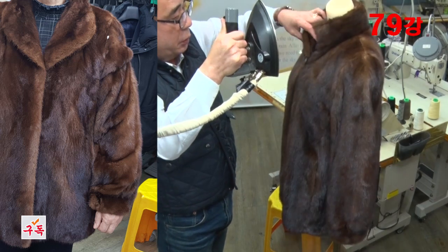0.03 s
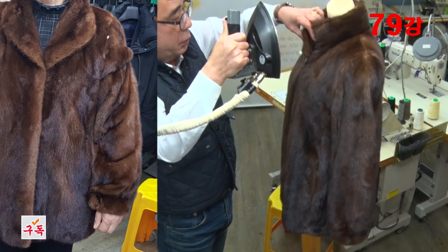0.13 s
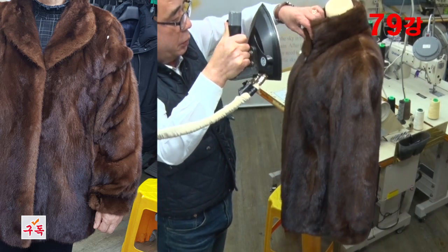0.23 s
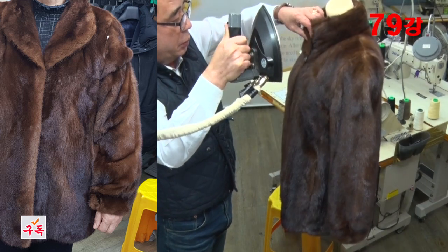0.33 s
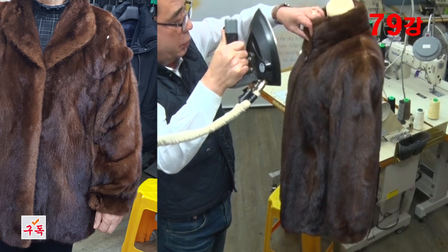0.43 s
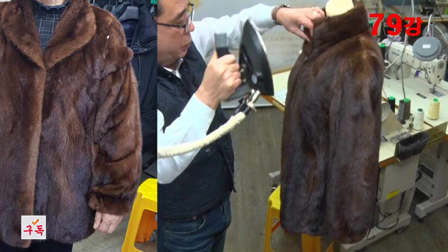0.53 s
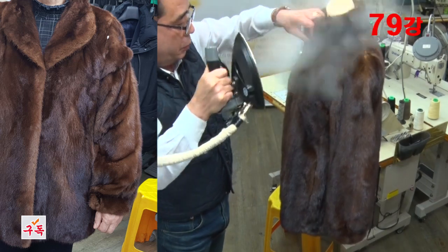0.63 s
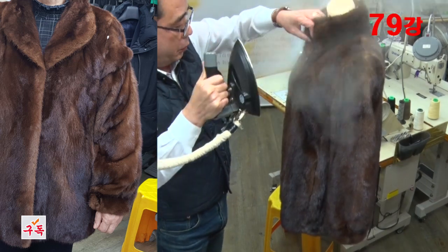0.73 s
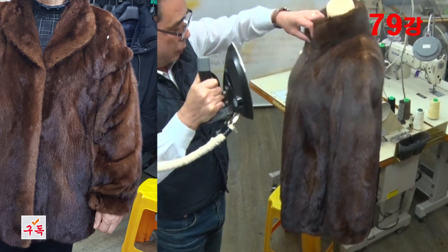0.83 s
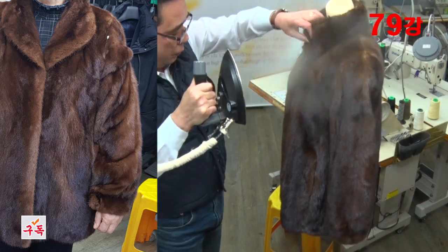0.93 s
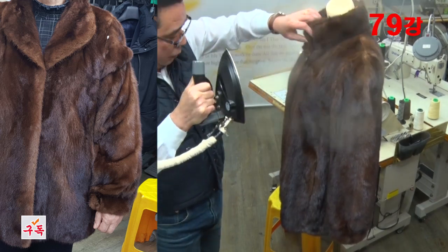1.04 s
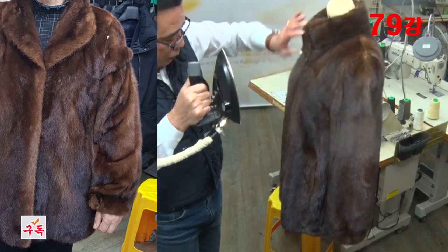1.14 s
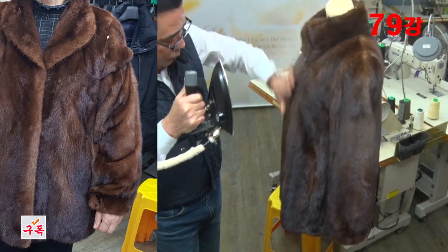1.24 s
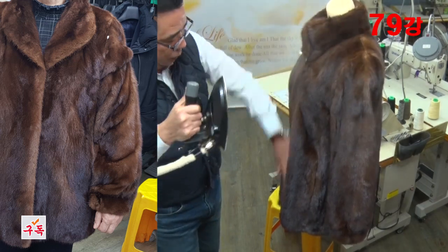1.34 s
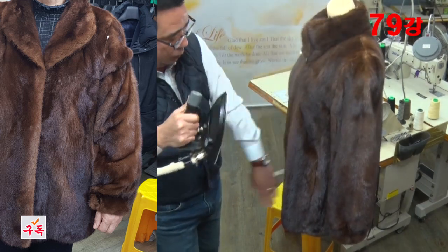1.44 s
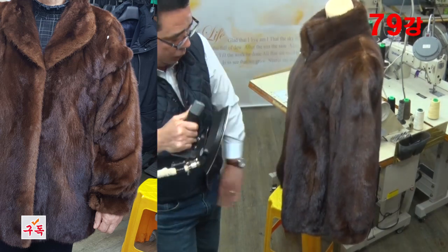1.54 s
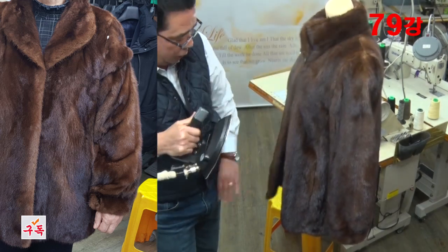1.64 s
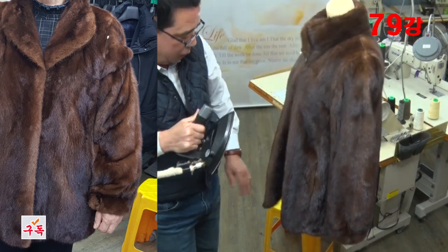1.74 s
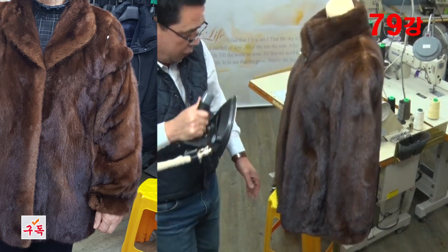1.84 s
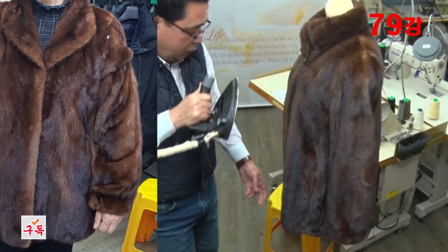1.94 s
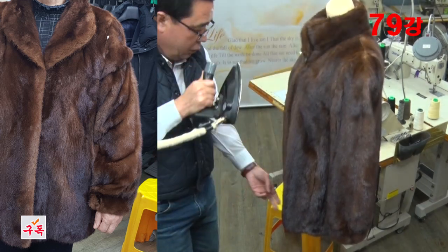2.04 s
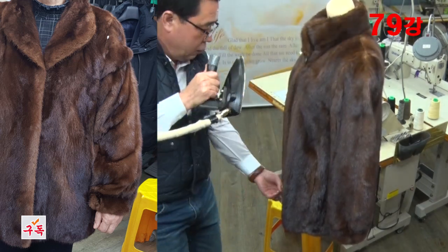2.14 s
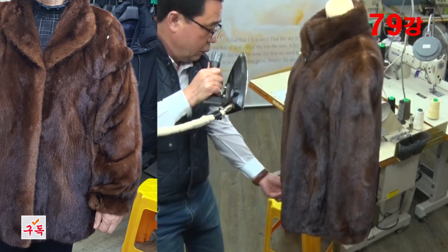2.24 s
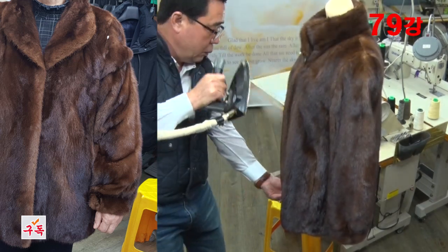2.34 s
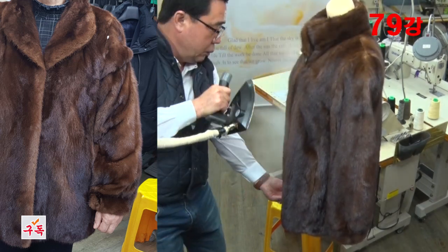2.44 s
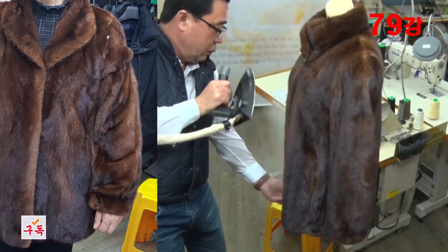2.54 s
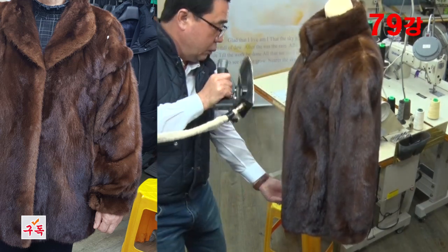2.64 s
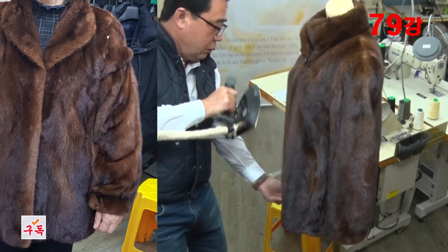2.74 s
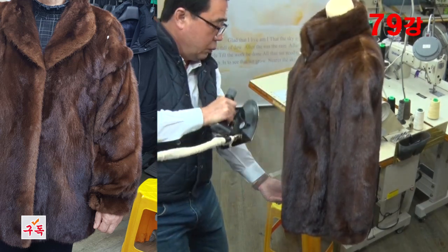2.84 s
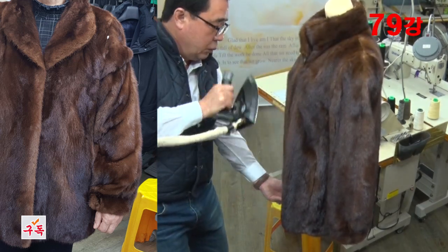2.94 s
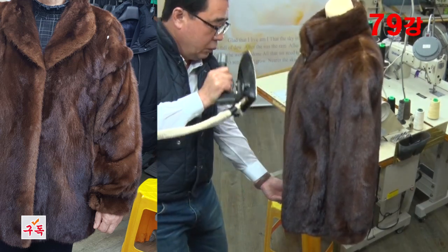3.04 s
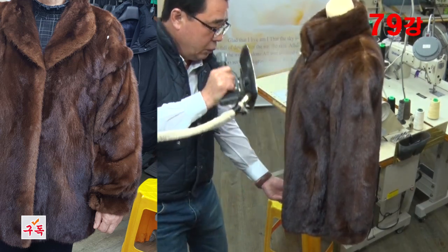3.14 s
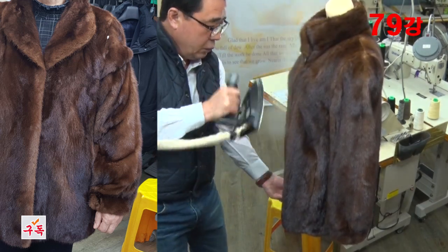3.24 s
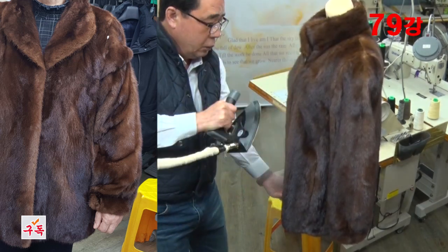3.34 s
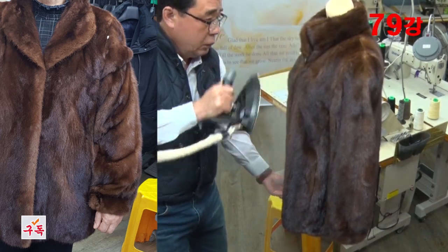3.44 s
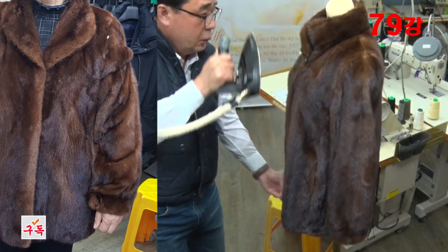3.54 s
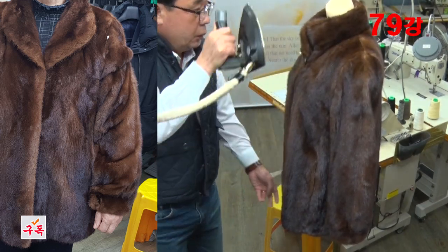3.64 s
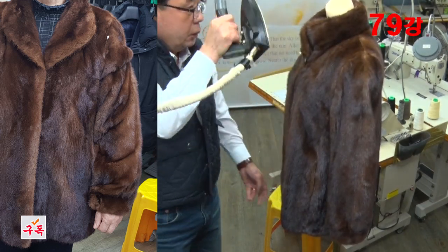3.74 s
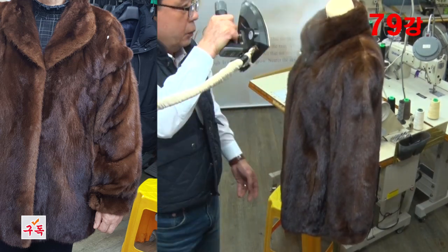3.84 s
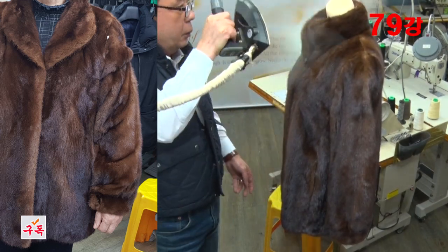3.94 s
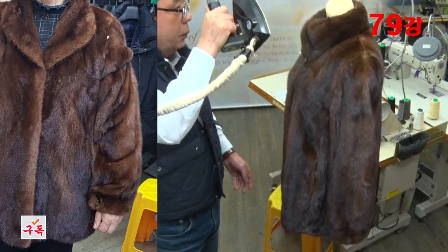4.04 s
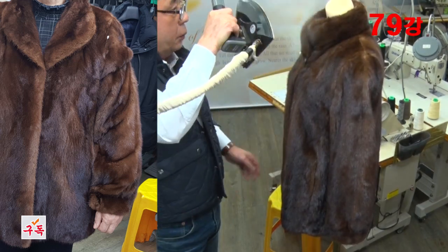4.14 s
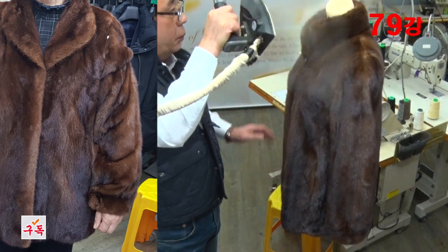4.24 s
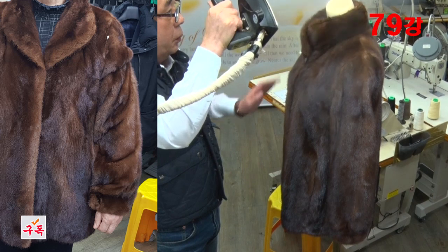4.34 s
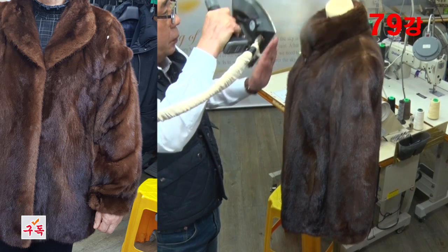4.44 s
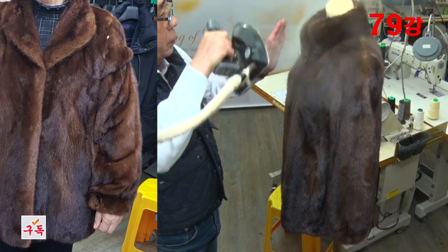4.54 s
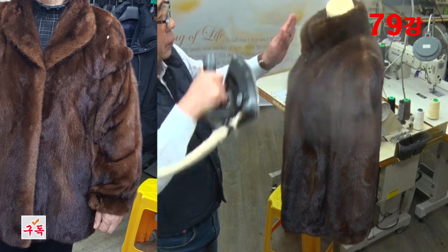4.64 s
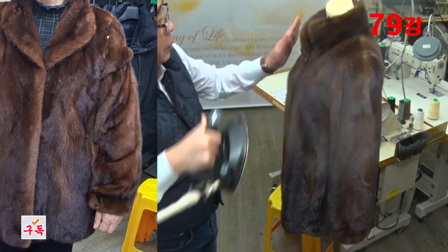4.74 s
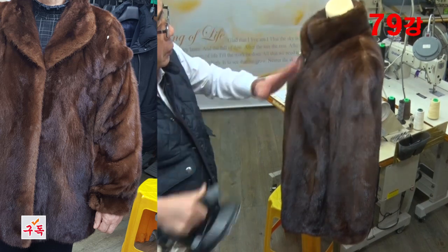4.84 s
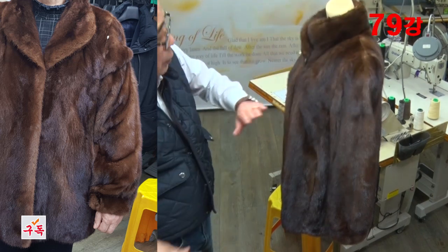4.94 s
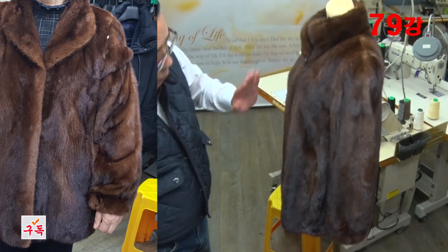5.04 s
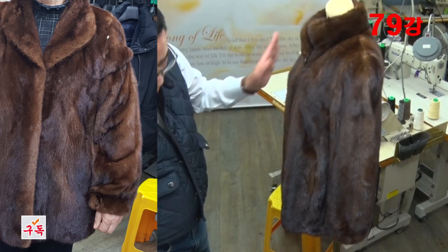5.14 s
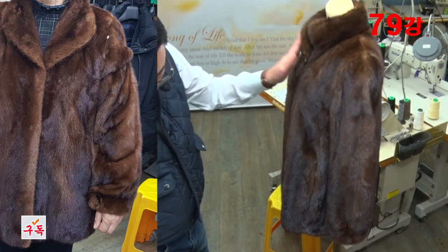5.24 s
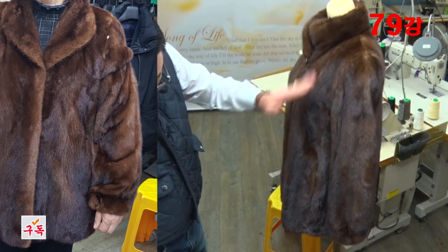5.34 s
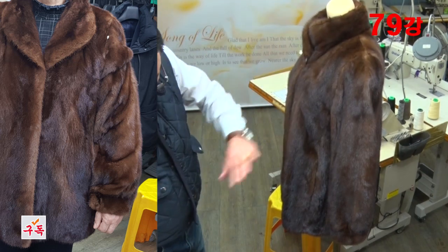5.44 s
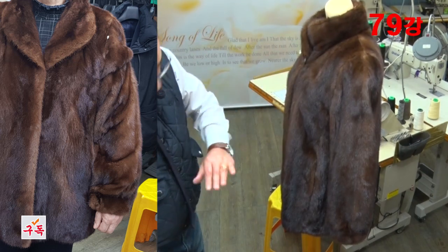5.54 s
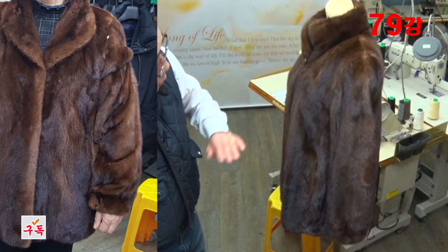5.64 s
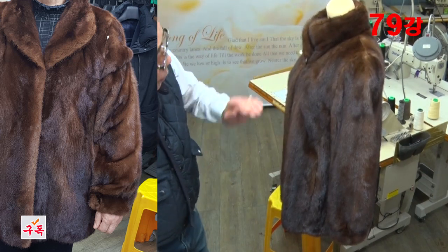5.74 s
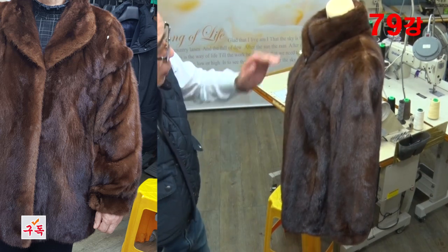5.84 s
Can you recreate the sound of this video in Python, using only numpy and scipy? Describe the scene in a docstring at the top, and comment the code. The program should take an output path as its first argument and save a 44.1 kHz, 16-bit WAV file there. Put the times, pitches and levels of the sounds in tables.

```python
"""A workshop, the microphone close to a hose-fed steam iron blowing seven bursts at a fur coat.
Turbulent jets hiss from the sole plate, coloured by the steam chamber; the valve leaks a trickle
and a nozzle whistles twice. Thin scrapes and a few dull knocks sound nearby; behind them a
transformer hums and a fan drones. The room answers briefly and the gain control ducks under the blasts."""
import sys
import numpy as np
from scipy import signal
from scipy.fft import rfft, irfft, next_fast_len
from scipy.io import wavfile
from scipy.ndimage import uniform_filter1d, map_coordinates

SR = 44100
rng = np.random.default_rng(int(sys.argv[2]) if len(sys.argv) > 2 else 0)


def file_out(sig):
    """Save sig as 16-bit WAV at sys.argv[1]."""
    # one column per channel
    cols = np.atleast_2d(sig).T
    # limit, then scale
    lim = np.clip(cols, -1, 1)
    pcm = np.round(lim * 32767).astype(np.int16)
    wavfile.write(sys.argv[1], SR, pcm)


N = 260190

# Transformer: (frequency [Hz], level [dB])
HUM_TONES = [(120, -46.5)]
# Fan: (frequency [Hz], width [Hz], level [dB])
FAN_TONES = [(74.3, 7.1, -52), (152.5, 8.8, -56), (304.7, 31, -63.5), (378, 10, -70), (101.5, 4.7, -58),
             (236, 18.7, -59), (808, 35, -67)]
# Spectra of the shop's air, low and high: (frequency [Hz], relative level [dB])
AIR_RUMBLE = [(12, -49), (25, -15), (36, -20), (48, -23), (60, -9.5), (90, -10.5), (140, -10), (200, -14),
              (270, -18), (385, -16), (800, -23.5), (1500, -24.5), (1950, -42), (3300, -120)]
AIR_TREBLE = [(880, -39), (1500, -6), (2040, -4.5), (3060, -7.5), (3930, -10.5), (5000, -12.5),
              (5800, -16.5), (7350, -19.5), (9300, -22.5), (10200, -29), (12500, -30.5), (15000, -44),
              (16000, -46)]
# Spectrum of the echo, filtered off above 10 kHz: (frequency [Hz], relative level [dB])
ECHO_COLOUR = [(60, -46), (500, -0.5), (3000, -4), (6000, 2.5), (10000, 1), (12000, -42)]
# Decay of the echo: (frequency [Hz], time to fall 60 dB [s])
ECHO_DECAY = [(300, .4), (2000, 0.5), (6000, 0.37), (14000, 0.16)]
# Likeness of left and right; above about 10 kHz the two sides become alike: (frequency [Hz], correlation [0-1])
AIR_LIKENESS = [(20, 1), (150, 1), (200, 1), (380, .98), (700, 0.93), (1290, 0.77), (2380, .71),
                (4400, .74), (8500, 0.55), (10500, 0.99), (12000, 1)]
JET_LIKENESS = [(700, 1), (1500, 1), (3500, 1), (4500, 0.98), (6000, 0.91), (9000, 0.92), (10500, 0.98),
                (12000, 1)]
# Thin hisses, always faintly there: (centre [Hz], level [dB])
FAINT_BANDS = [(1960, -69), (4350, -73), (4920, -73)]
# Scrapes near the same pitches: (start [s], length [s], centre [Hz], level [dB])
SCRAPES = [(1.915, 0.042, 1920, -54), (1.92, .08, 4300, -62), (1.99, 0.037, 1950, -57),
           (2.01, 0.244, 4310, -58), (2.01, .07, 4900, -62), (2.07, 0.11, 1870, -57),
           (2.197, 0.058, 1964, -59), (3.62, 0.18, 4900, -64), (4.917, 0.054, 4370, -58.5),
           (4.93, 0.08, 4920, -62), (4.93, 0.073, 1980, -58), (5.05, 0.049, 1900, -53.5),
           (5.136, .06, 2080, -50), (5.255, 0.097, 2030, -54), (5.265, 0.1, 4990, -64),
           (5.43, 0.15, 1836, -61), (5.63, .17, 4850, -66), (5.7, 0.086, 1865, -55), (5.84, .05, 4500, -60),
           (5.853, .05, 1900, -58)]
# Dull knocks: (time [s], relative level [dB], ring offset [dB])
KNOCKS = [(2.232, -30.5, -15), (2.299, -31, -17), (2.468, -44.5, 7.5), (2.568, -29, -17),
          (2.854, -30, -6.5), (3.176, -28.5, -11), (3.318, -46, 4), (3.419, -41.5, 1.5), (3.539, -37.5, -1)]
# Modes of the hollow body: (frequency [Hz], relative level [dB], time to fall 60 dB [s])
KNOCK_MODES = [(239.5, 0.5, 0.12), (340.4, -3.5, 0.18), (453, 2.5, 0.068), (598, 0.5, 0.089),
               (147, 3, 0.11)]
# Spectra of the steam: (frequency [Hz], relative level [dB])
ROAR_SPECTRUM = [(470, -23), (800, -11), (864, -10.5), (1320, -4.5), (1420, -5.5), (1960, 0.5),
                 (2620, -1.5), (3300, 0.5), (4290, -4), (7260, -120)]  # large eddies
HISS_SPECTRUM = [(1940, -23), (3300, -9.5), (3880, -5.5), (4770, 1.5), (6000, -5), (7800, -6),
                 (13200, -120)]  # jets at the sole-plate holes
BRIGHT_SPECTRUM = [(3530, -40.5), (6000, -3), (6810, -4.5), (8210, -2.5), (10500, -7), (13600, -16.5),
                   (22000, -120)]  # the part that beams along the jet
FIZZ_SPECTRUM = [(6180, -22), (10500, -4.5), (13200, -6.5), (15100, -5.5), (15800, -8.5)]  # finest turbulence
SPIT_SPECTRUM = [(2500, -30), (3700, -8), (4300, 1), (5300, -2), (6200, -12), (9000, -24), (14000, -60)]  # the first thin jet
# Steam chamber resonances: (centre [Hz], width [Hz], lift [dB])
CHAMBER_RESONANCES = [(1950, 96, -1), (4700, 120, -3), (5460, 150, 3), (8300, 320, 2)]
# Nozzle whistles, one path each: (time [s], level [dB], pitch [Hz])
WHISTLE_PATHS = [
    [(1.2, -62, 4900), (1.35, -49, 4830), (1.42, -46, 4820), (1.5, -54, 4880), (1.56, -60, 4850)],
    [(2.7, -59, 6430), (2.94, -42, 6300), (3.05, -46.5, 6400), (3.14, -43, 6460), (3.22, -40, 6400),
     (3.3, -52, 6500), (3.5, -48, 6250), (3.6, -64, 6480), (3.8, -66, 6480)],
]
# Their bandwidths: (first [Hz], second [Hz])
WHISTLE_WIDTHS = [800, 260]
# Trigger presses: (start [s], attack [s], held [s], hiss level [dB], sag [dB/s], release [dB/s],
# spit delay [s], spit level [dB], roar [dB], bright [dB], fizz [dB], aim left over right [dB]);
# roar, bright and fizz are relative to the hiss
PRESSES = [(0.576, 0.076, 0.22, -27.5, 17, 220, 0.013, -30, -4.5, 2, -3.5, 0.58),
           (0.895, 0.053, 0.21, -30, 7.1, 140.4, 0.0099, -32, -5, 3, -4, .8),
           (2.345, 0.085, .725, -29.5, 5.7, 133, 0.0033, -39, -6, 2.1, -4.5, 1.2),
           (3.185, 0.037, 0.34, -31, 4.9, 270, 0.01, -27, -5.5, 1.9, -3, 1.1),
           (3.798, 0.066, 0.25, -32, 5.2, 238, .005, -29.5, -4, 5.3, -1.5, .4),
           (4.156, 0.045, .19, -31, 5.1, 241, 0.015, -31, -5, 3.4, -4.5, 0.51),
           (4.465, 0.047, 0.24, -30.5, 1.1, 270, .006, -36, -4.5, 2.5, -5.5, .3)]
# Colour shifts within a press: (roar [dB], bright [dB], fizz [dB], aim [dB])
LOST_WHILE_HELD = [-0.1, 1, -3, 0]
MISSING_AT_OPENING = [2, 5, 5, -1.2]
# Leaks past the valve: (start [s], length [s], hiss level [dB], first bright [dB], last bright [dB],
# fizz [dB])
TRICKLES = [(1.105, 0.39, -42, 6, -4, -10), (3.053, 0.2, -44.5, -2, 12, -4),
            (4.042, 0.21, -45.5, -7, -2, -9)]


def amp(db):
    """dB to gain."""
    return 10 ** (np.asarray(db) / 20)


def unit(x):
    """Scaled to rms 1."""
    return x / np.sqrt(np.mean(x ** 2) + 1e-20)


def along(points, hz):
    """(frequency [Hz], value) points joined on a log axis."""
    freqs, values = np.transpose(points)
    return np.interp(np.log(hz + 1), np.log(freqs + 1), values)


def wobble(rate):
    """A smooth random curve, rate knots a second."""
    knots = rng.standard_normal(int(N * rate / SR) + 4)
    return map_coordinates(knots, [np.arange(N) * rate / SR])


def filtered(x, response):
    """x shaped by a gain that depends on frequency."""
    size = next_fast_len(N + SR // 2)
    return irfft(rfft(x, size) * response(np.fft.rfftfreq(size, 1 / SR)), size)[..., :N]


def rush(spectrum_db, likeness, patchy_db, drift_db=0):
    """Stereo noise of rms 1 with small patches of random gain and a slower drift of colour."""
    def patches(bins, frames):  # 86 Hz a bin, 6 ms a frame
        field = uniform_filter1d(rng.standard_normal(cells.shape[1:]), bins, axis=0)
        return unit(uniform_filter1d(field, frames, axis=1))

    def mid_side_gains(hz):
        angle = np.arccos(np.clip(along(likeness, hz), -1, 1)) / 2
        return amp(spectrum_db(hz)) * [np.cos(angle), np.sin(angle)]

    cells = signal.stft(rng.standard_normal((2, N)), nperseg=512)[2]
    cells *= amp(patchy_db * patches(4, 8) + drift_db * patches(10, 50))
    pair = signal.istft(cells, nperseg=512)[1][:, :N]
    mid, side = filtered(pair, mid_side_gains)
    return unit(np.array([mid + side, mid - side]))


def narrow(hz, width):
    """A wavering tone of rms 1: noise width Hz wide about a centre that may move."""
    slow = filtered(rng.standard_normal((2, N)), lambda f: 1 / (1 + (2 * f / width) ** 4))
    phase = 2 * np.pi * np.cumsum(hz * np.ones(N)) / SR
    return unit(slow[0] * np.cos(phase) + slow[1] * np.sin(phase))


def shop_air():
    """Room tone: a broad rumble, and treble a little to the left."""
    rumble = rush(lambda hz: along(AIR_RUMBLE, hz), AIR_LIKENESS, patchy_db=1.1)
    treble = rush(lambda hz: along(AIR_TREBLE, hz), AIR_LIKENESS, patchy_db=0.8)
    return amp(-47) * rumble + amp(-52.5) * treble * amp([[.4], [-.4]])


def transformer():
    """Mains hum in the background, almost steady."""
    t = np.arange(N) / SR
    return sum(amp(db + 0.14 * wobble(3.54)) * np.sqrt(2) * np.sin(2 * np.pi * hz * t)
               for hz, db in HUM_TONES)


def fan():
    """A background drone of unsteady tones."""
    return sum(amp(db) * narrow(hz, width) for hz, width, db in FAN_TONES)


def room_echo(near):
    """The workshop's short answer, each frequency dying at its own speed."""
    hz, t, cells = signal.stft(rng.standard_normal((2, SR // 2)), SR, nperseg=256)
    fade = amp(along(ECHO_COLOUR, hz)[:, None] - 60 * t / along(ECHO_DECAY, hz)[:, None])
    tail = signal.istft(cells * fade, SR, nperseg=256)[1]
    return signal.fftconvolve(near[None], tail / np.linalg.norm(tail[0]), axes=1)[:, :N]


def scrapes(width_hz=260, edge_s=.03):
    """Faint narrow hisses, and short flickering scrapes between the bursts."""
    t = np.arange(N) / SR
    bands = sum(amp(db + 3.9 * wobble(9.1)) * narrow(hz, width_hz) for hz, db in FAINT_BANDS)
    flicker = amp(2.5 * wobble(35))
    for start, length, hz, db in SCRAPES:
        swell = np.clip(np.minimum(t - start, start + length - t) / edge_s + .5, 0, 1)
        bands += amp(db) * swell * flicker * narrow(hz, width_hz)
    return bands


def knocks(ring_hz=767, ring_t60_s=0.23):
    """Soft blows on something hollow nearby, each with a rough higher ring."""
    track, t = np.zeros(N + SR), np.arange(SR // 4) / SR
    rattle = np.sin(2 * np.pi * ring_hz * np.arange(N) / SR) + 0.72 * narrow(ring_hz, width=110)
    onset = 1 - np.exp(-t / 0.006)
    for start, db, ring_db in KNOCKS:
        at = round(start * SR)
        body = 0
        for hz, mode_db, t60 in KNOCK_MODES:
            decay = amp(mode_db + rng.normal(0, 2.66) - 60 * t / t60)
            body += decay * np.sin(2 * np.pi * hz * rng.normal(1, 0.044) * t)
        ring = amp(ring_db + 5 - 60 * t / ring_t60_s) * rattle[at:][:len(t)]
        track[at:][:len(t)] += amp(db - 10) * (.75 * body + ring) * onset
    return track[:N]


def whistles():
    """A nozzle sings, once as the flow trails off and once in the long blast."""
    t, track = np.arange(N) / SR, np.zeros(N)
    for path, width in zip(WHISTLE_PATHS, WHISTLE_WIDTHS):
        times, db, hz = np.transpose(path)
        blowing = uniform_filter1d(1. * ((t >= times[0]) & (t <= times[-1])), size=900)
        track += blowing * amp(np.interp(t, times, db)) * narrow(np.interp(t, times, hz), width)
    return track


def valve(edge_s=0.021, leak_fade_db_s=253, leak_roar_db=-5.5, leak_aim_db=1.5):
    """Flow gain, then roar, bright, fizz and aim in dB: presses rise, sag and shut; trickles linger."""
    def since(moment):  # seconds past it, with a rounded knee
        return edge_s / 2 * np.logaddexp(0, (t - moment) / (edge_s / 2))

    t = np.arange(N) / SR
    power, colour = np.full(N, 1e-14), np.zeros((4, N))  # colour is averaged by power
    for start, attack, held, db, sag, release, _, _, *mix_db in PRESSES:
        age = t - start
        opened, progress = np.clip(age / attack, 0, 1), np.clip(age / held, 0, 1)
        level_db = db - sag * np.clip(age - attack, 0, held) - release * since(start + held)
        press = opened ** 1.2 * amp(level_db)
        lost_db = np.outer(LOST_WHILE_HELD, progress - .5)
        missing_db = np.outer(MISSING_AT_OPENING, (1 - opened) ** 2)
        power += press ** 2
        colour += press ** 2 * (np.array(mix_db)[:, None] - lost_db - missing_db)
    for start, length, db, first_db, last_db, fizz_db in TRICKLES:
        leak = np.clip((t - start) / edge_s, 0, 1) * amp(db - leak_fade_db_s * since(start + length))
        bright_db = np.interp(t, [start, start + length], [first_db, last_db])
        power += leak ** 2
        colour += [leak ** 2 * part for part in (leak_roar_db, bright_db, fizz_db, leak_aim_db)]
    return np.sqrt(power), *(colour / power)


def jet(spectrum, patchy_db):
    """Turbulence lifted at the steam chamber's resonances; its colour drifts as the iron turns."""
    def spectrum_db(hz):
        lift = sum(db / (1 + (2 * (hz - centre) / width) ** 2)
                   for centre, width, db in CHAMBER_RESONANCES)
        return along(spectrum, hz) + lift

    return rush(spectrum_db, JET_LIKENESS, patchy_db, drift_db=-0.13)


def spits(t60_s=0.051, rise_s=0.0017):
    """The first thin jet as each press cracks the valve open."""
    envelope, t = np.zeros(N), np.arange(SR // 20) / SR
    puff = amp(-6 - 60 * t / t60_s) * (1 - np.exp(-t / rise_s))
    for start, _, _, _, _, _, delay, db, *_ in PRESSES:
        envelope[round((start + delay) * SR):][:len(t)] = amp(db) * puff
    return envelope * jet(SPIT_SPECTRUM, patchy_db=-1.0)


def steam(full_flow_db=-31.5):
    """Jets close to the microphone: droplets make them sputter, and they thin out below full flow."""
    flow, roar_db, bright_db, fizz_db, aim_db = valve()
    under_db = np.clip(20 * np.log10(flow) - full_flow_db, -40, 0)
    pan_db = aim_db + .3 * wobble(8)
    sputter = amp(0.23 * wobble(30.03) + 0.35 * wobble(400))
    hiss = jet(HISS_SPECTRUM, patchy_db=1.2)
    bright = amp(bright_db + 0.25 * under_db) * jet(BRIGHT_SPECTRUM, patchy_db=1.6)
    roar = amp(roar_db + 0.12 * under_db) * jet(ROAR_SPECTRUM, patchy_db=2.0)
    fizz = amp(fizz_db + 0.71 * under_db) * jet(FIZZ_SPECTRUM, patchy_db=.7)
    beam = (hiss + bright) * amp([pan_db / 2, -pan_db / 2])  # directional: sways across the microphone
    return flow * sputter * (beam + roar + fizz)


def scene():
    """The iron and small sounds up close, their echo, and the shop behind."""
    near = steam() + whistles() + spits() + scrapes() + knocks()
    return near + amp(-18) * room_echo(near.mean(axis=0)) + transformer() + fan() + shop_air()


def record(dry, follow_s=.3, knee_db=-46, top_hz=15760, edge_hz=150):
    """Behind the microphone, gain control ducks under the blasts and a steep filter cuts the top."""
    def band_limit(hz):
        return np.sin(np.pi / 2 * np.clip((top_hz - hz) / edge_hz + .5, 0, 1)) ** 2

    pole = np.exp(-1 / (follow_s * SR))
    power = signal.lfilter([1 - pole], [1, -pole], np.mean(dry ** 2, axis=0))
    duck = (1 + power / amp(knee_db) ** 2) ** -.07
    return filtered(dry * duck * amp(1.65), band_limit)


dry = scene()
out = record(dry)
file_out(out)
```